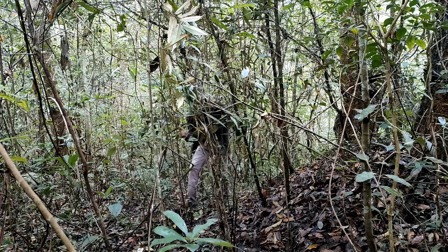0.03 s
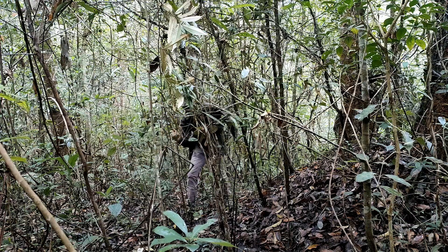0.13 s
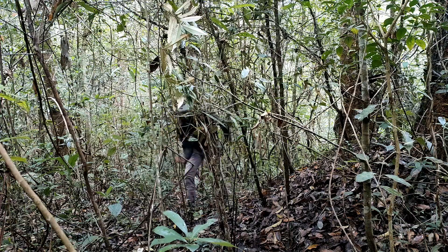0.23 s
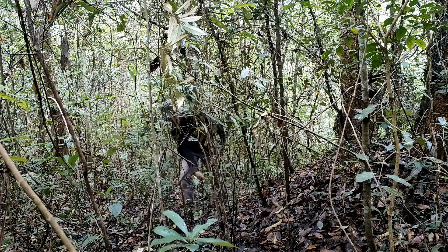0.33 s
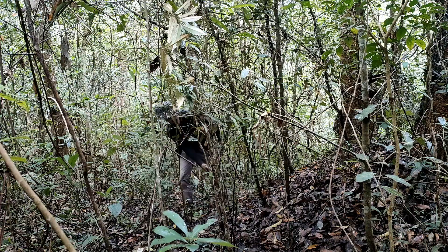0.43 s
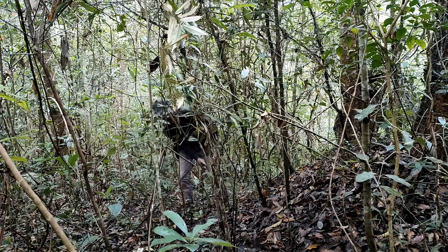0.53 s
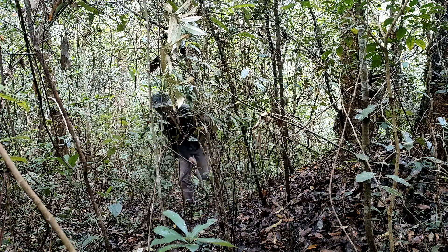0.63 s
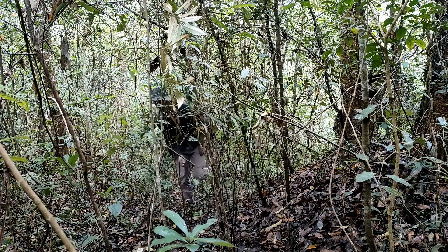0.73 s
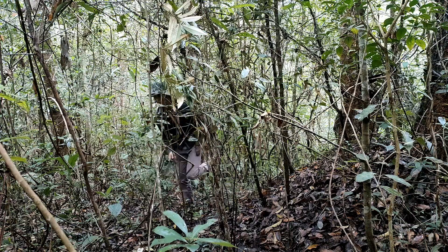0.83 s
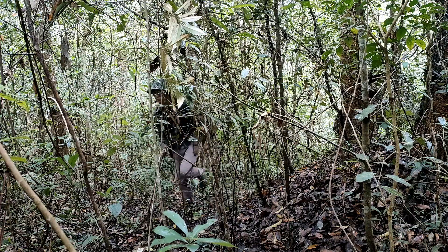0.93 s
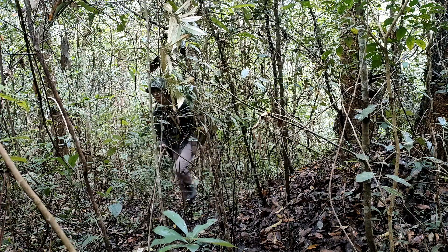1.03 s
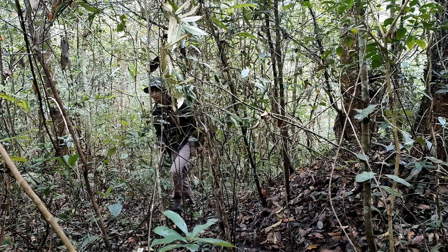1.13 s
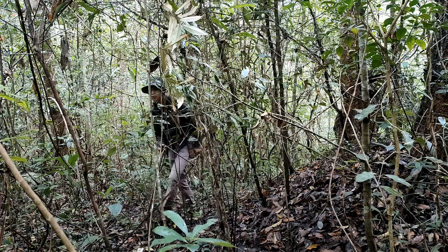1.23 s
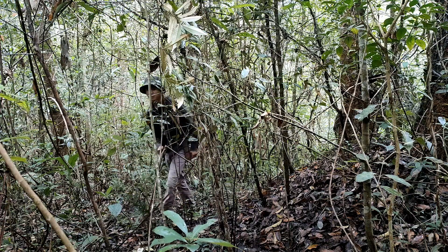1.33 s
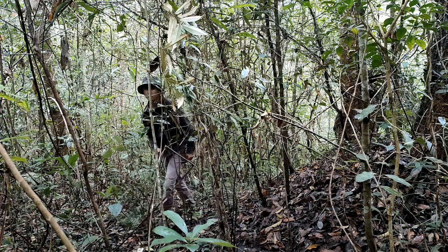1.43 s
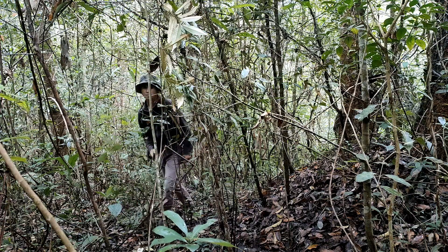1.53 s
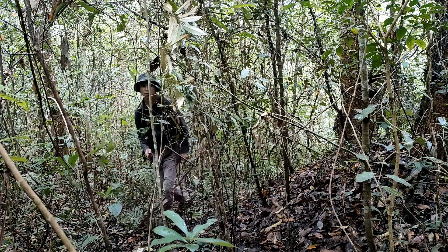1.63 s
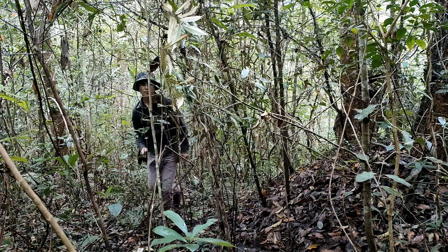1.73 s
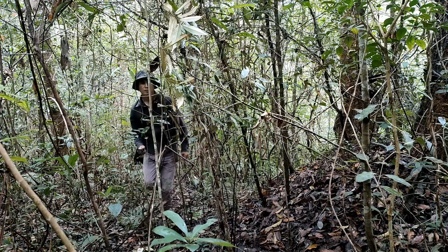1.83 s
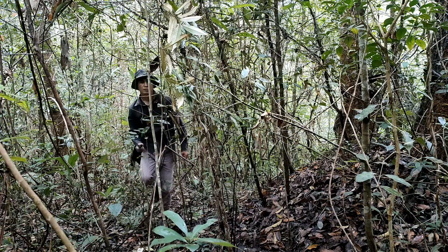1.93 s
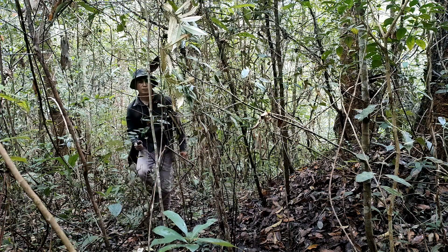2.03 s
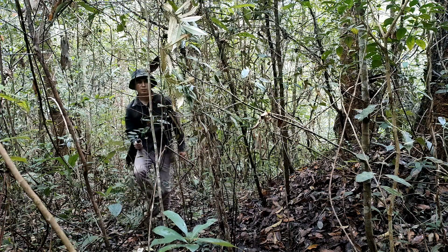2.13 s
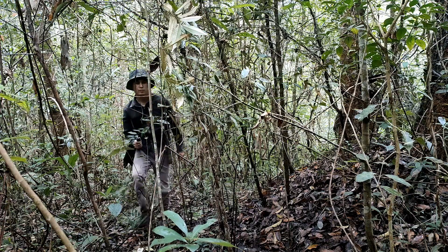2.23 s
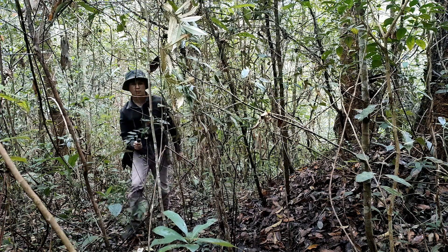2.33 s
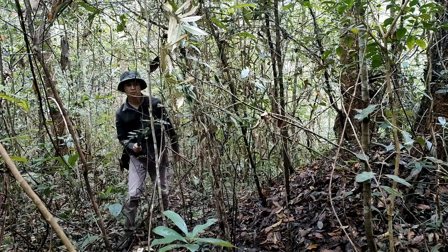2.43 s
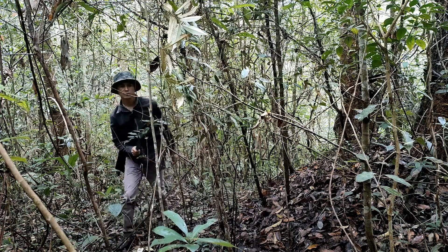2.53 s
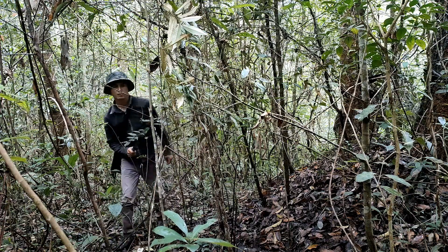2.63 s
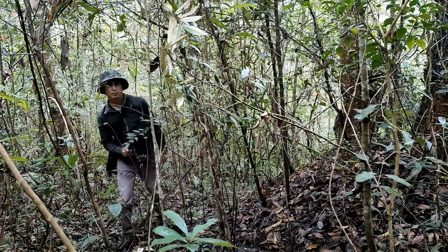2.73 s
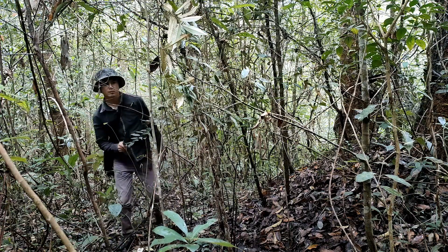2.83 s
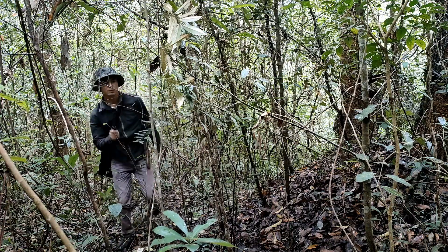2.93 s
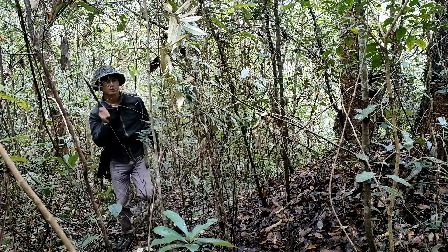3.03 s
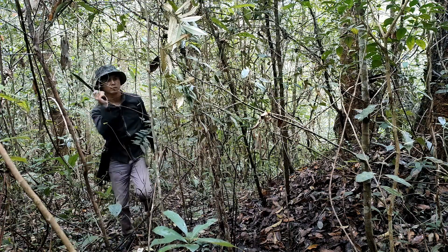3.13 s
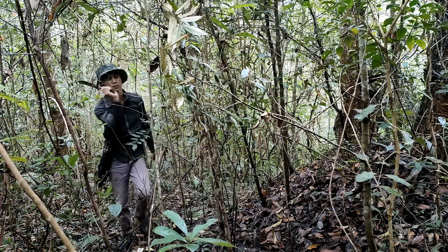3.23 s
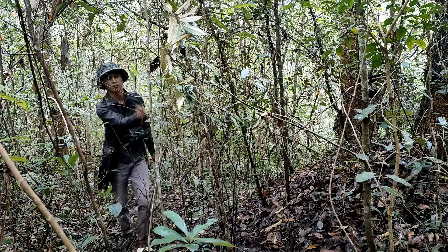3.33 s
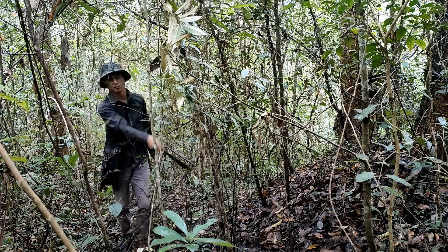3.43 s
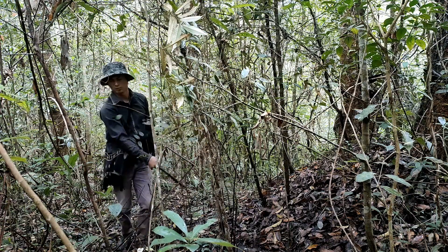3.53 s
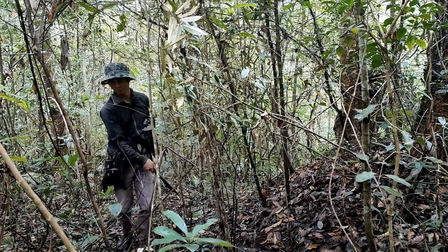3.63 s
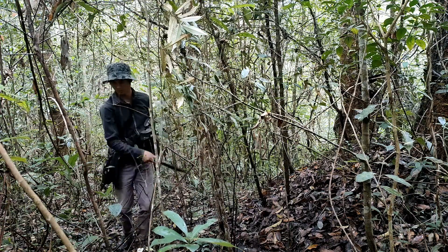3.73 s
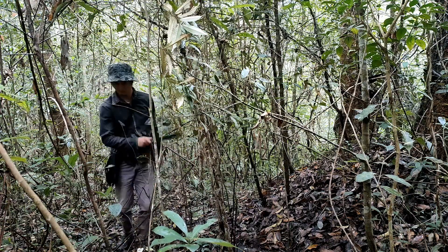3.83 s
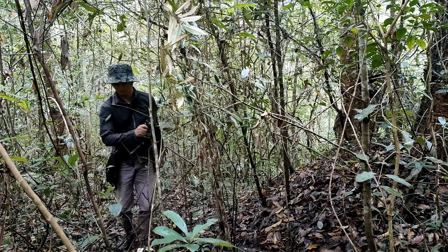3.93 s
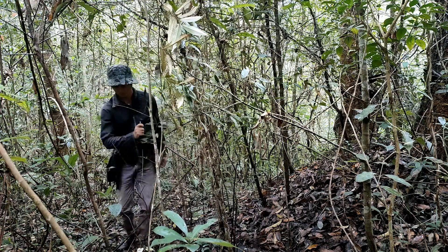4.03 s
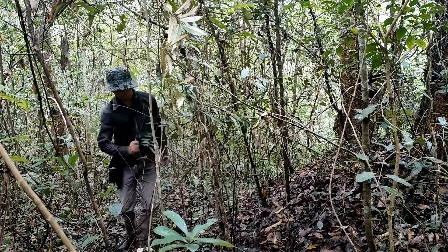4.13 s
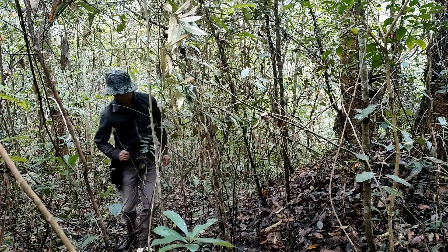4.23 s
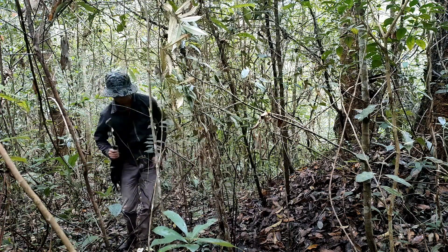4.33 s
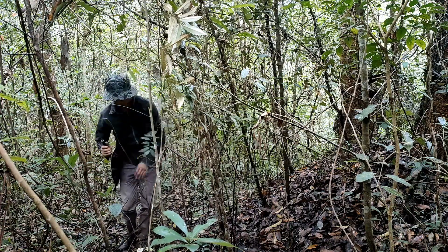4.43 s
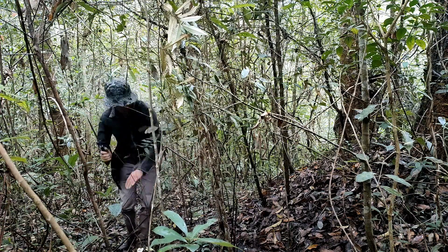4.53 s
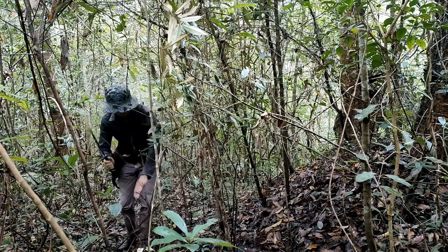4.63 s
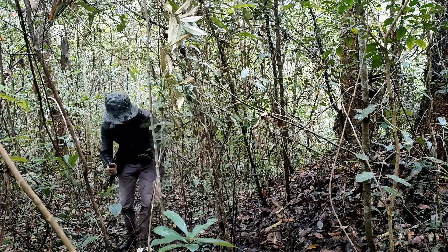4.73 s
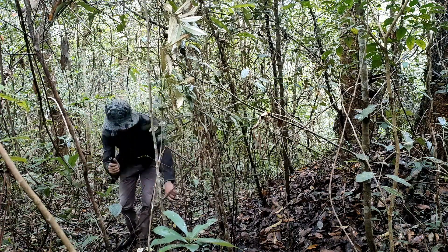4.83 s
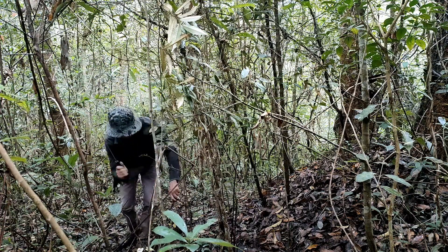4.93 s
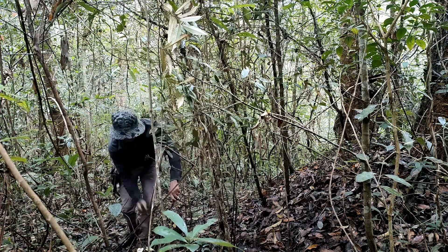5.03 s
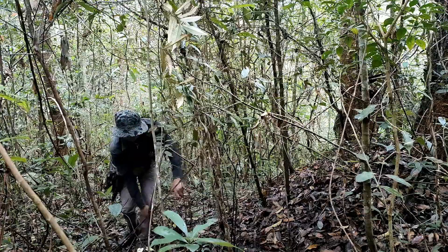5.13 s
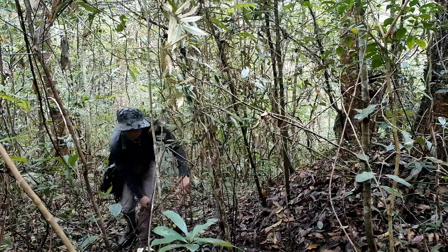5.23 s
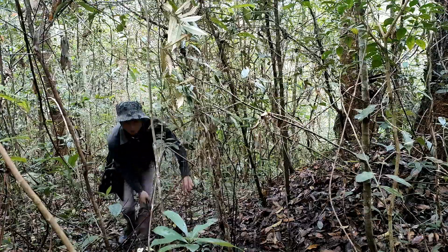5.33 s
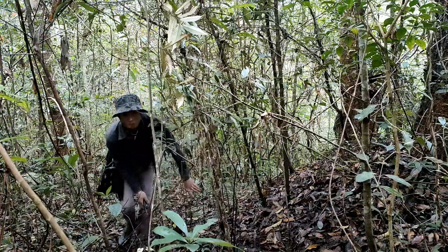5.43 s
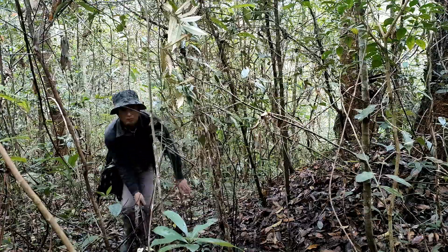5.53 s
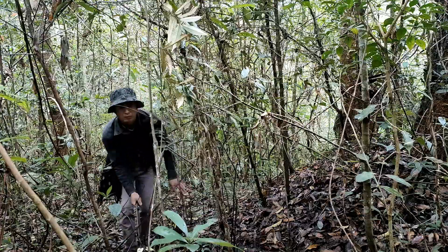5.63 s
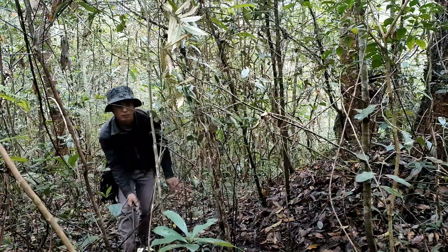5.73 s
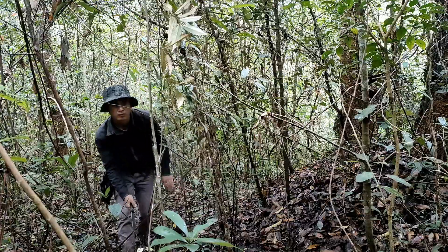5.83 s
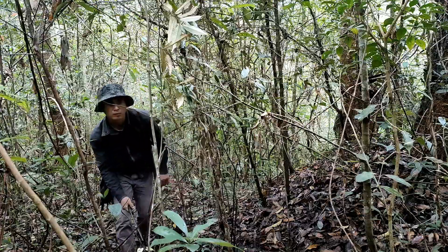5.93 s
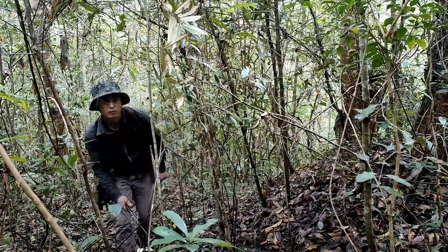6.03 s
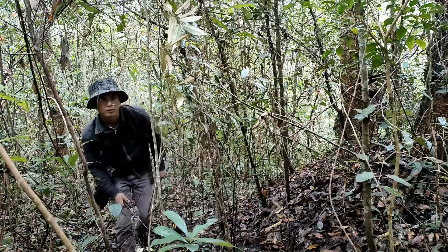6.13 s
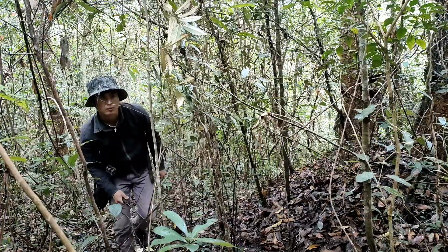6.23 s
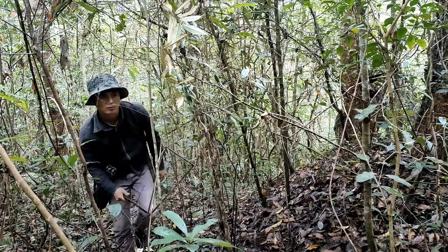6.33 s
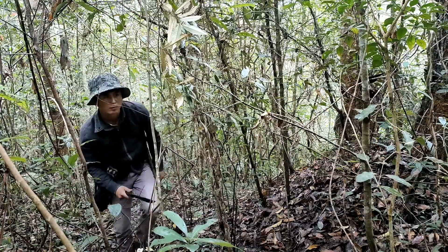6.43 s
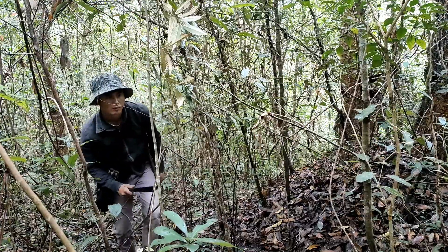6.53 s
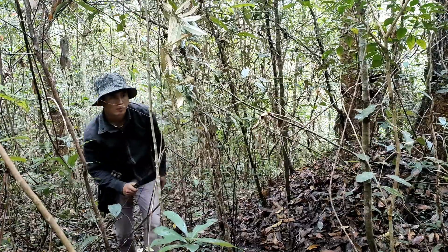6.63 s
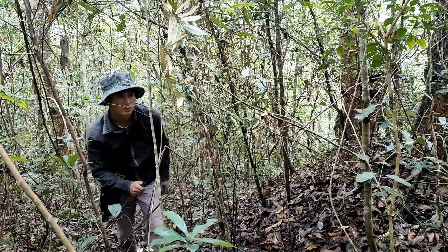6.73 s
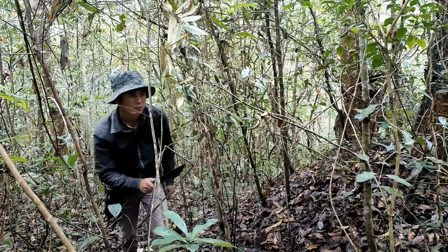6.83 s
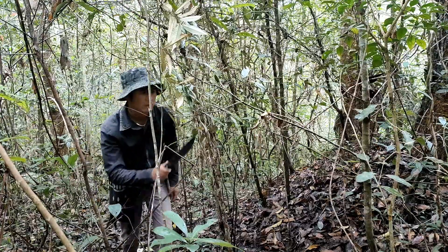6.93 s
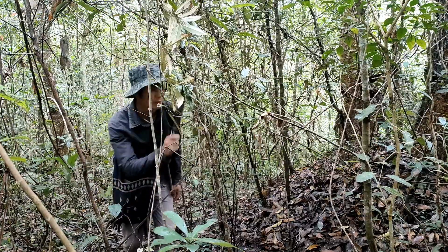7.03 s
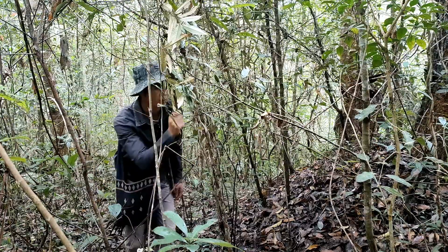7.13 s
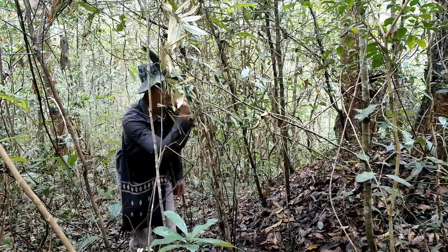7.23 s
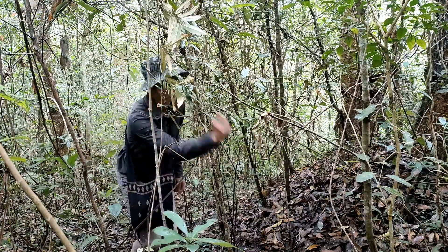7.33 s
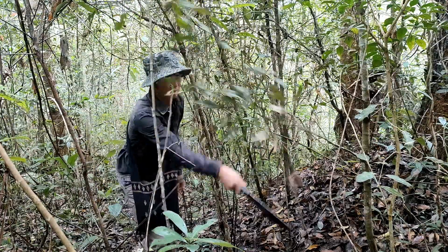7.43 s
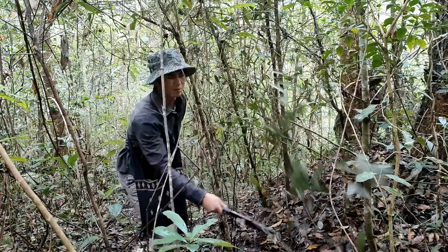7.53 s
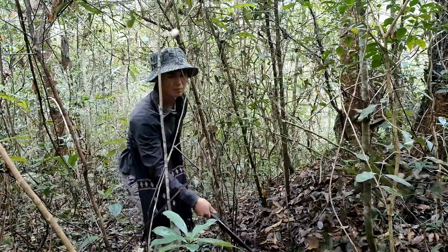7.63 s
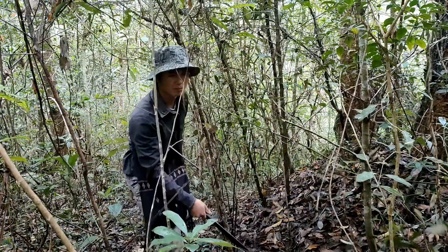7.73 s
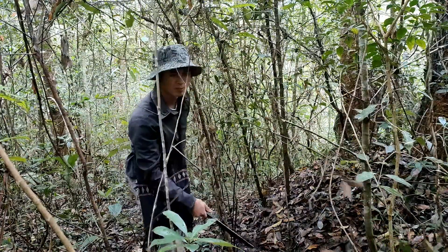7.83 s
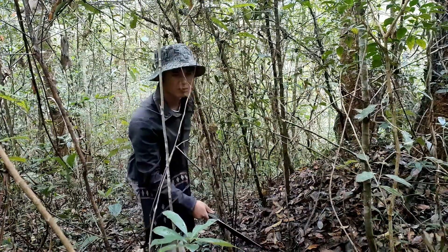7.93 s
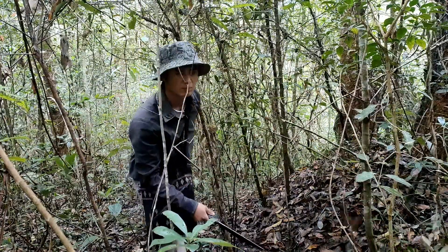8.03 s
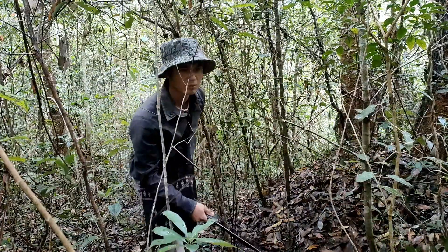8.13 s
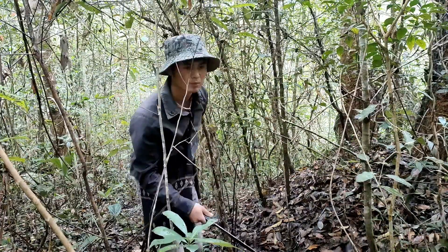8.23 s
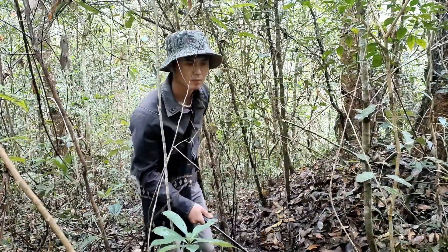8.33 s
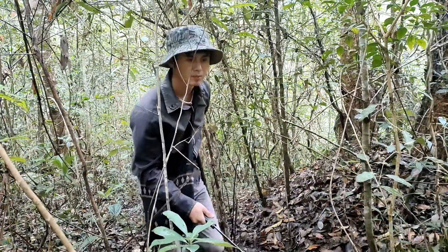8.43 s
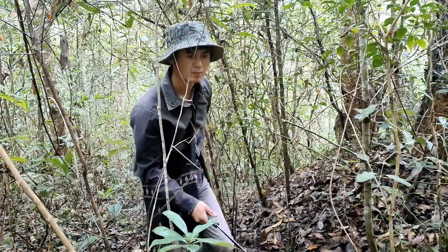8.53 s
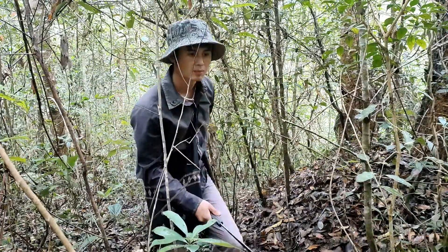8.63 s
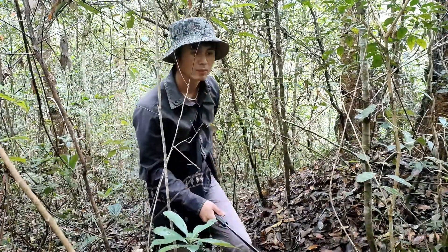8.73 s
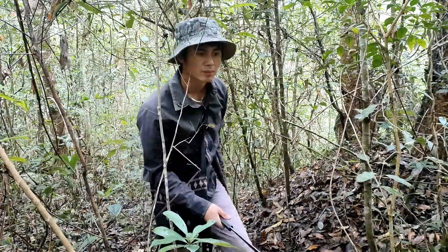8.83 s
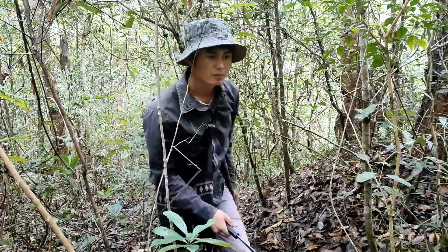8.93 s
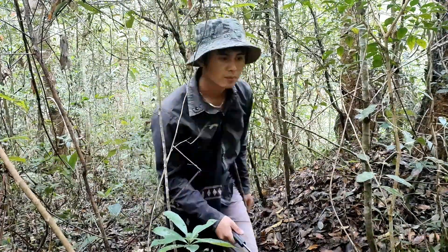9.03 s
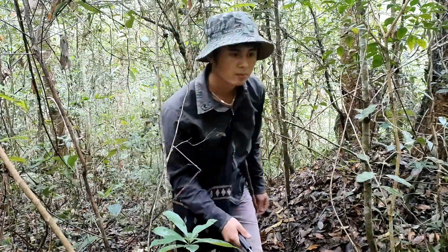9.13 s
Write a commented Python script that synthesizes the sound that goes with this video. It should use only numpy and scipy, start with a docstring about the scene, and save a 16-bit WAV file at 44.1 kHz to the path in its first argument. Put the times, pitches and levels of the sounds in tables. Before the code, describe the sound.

Outdoors among trees, faint wind rumble and soft hush surround irregular crunchy footsteps and brushing undergrowth. Crisp twig cracks and soft ground thuds punctuate quiet gaps; a far bird whistles downward three times. A sudden blade stroke near the end is by far the loudest, followed by dense cracking and rustling that fades. The stereo microphone is fixed, with light woodland echo.

```python
"""Light wind rumbles on a two-port microphone over a faint forest hush, while a walker treads dry leaf litter.
From the start the leaves crackle in dense random grains; twigs soon snap as sharp impulses with noise bursts,
and heels thud as damped sines. A far bird then whistles three times, a falling tone with an echo of trunks.
Late on, the loudest slashing brings a short blade ring and a flurry of cracks, before the litter settles."""
import sys
import numpy as np
from scipy import signal
from scipy.fft import rfft, irfft, next_fast_len
from scipy.io import wavfile
from scipy.ndimage import uniform_filter1d, map_coordinates

SR = 44100
rng = np.random.default_rng(int(sys.argv[2]) if len(sys.argv) > 2 else 0)


def unload_audio(sound):
    """Save the sound as a 16-bit wav file, at the path given as the first command line argument."""
    columns = np.transpose(np.atleast_2d(sound))
    # keep every value between -1 and 1, then stretch to whole-number steps
    steps = np.round(np.clip(columns, -1, 1) * 32767)
    wavfile.write(sys.argv[1], SR, steps.astype(np.int16))


N = 404327


def amp(db):
    """Decibel law: the amplitude ratio for a level in dB."""
    return 10 ** (np.asarray(db) / 20)


def unit(x):
    """Normalization: scale to a root-mean-square value of 1."""
    return x / np.sqrt(np.mean(x ** 2) + 1e-20)


def along(points, hz):
    """Logarithmic frequency scale: interpolate (Hz, value) points along it."""
    point_hz, value = np.transpose(points)
    return np.interp(np.log(hz + 1), np.log(point_hz + 1), value)


def curves(rows, t=np.arange(N) / SR):
    """Linear interpolation in time: one curve for each column after the time."""
    s, *columns = np.transpose(rows)
    return [np.interp(t, s, column) for column in columns]


def wobble(rate):
    """Slow random modulation: a smooth curve through random knots, rate of them a second."""
    knots = rng.standard_normal(int(N * rate / SR) + 4)
    return map_coordinates(knots, [np.arange(N) * rate / SR])


def filtered(x, response):
    """Linear filtering: multiply the spectrum by a response, a function of frequency in Hz."""
    n = x.shape[-1]
    padded = next_fast_len(n + 8192)
    return irfft(rfft(x, padded) * response(np.fft.rfftfreq(padded, 1 / SR)), padded)[..., :n]


def above(hz, edge_hz):
    """High-pass weighting: a soft step from 0 to 1, about one half at the edge."""
    return 1 / (1 + (edge_hz / (hz + 1)) ** 4)


def patchy(x, depth_db):
    """Time-frequency modulation: random gain in small and large patches, shared by both ports."""
    z = signal.stft(x, nperseg=256)[2]

    def blurred(bins, frames):
        noise = rng.standard_normal(z.shape[1:])
        return unit(uniform_filter1d(uniform_filter1d(noise, bins, 0), frames, 1))

    field = blurred(4, 8) + blurred(12, 24)
    return signal.istft(z * amp(depth_db * unit(field)), nperseg=256)[1][:, :N]


# Wind pressure spectrum: frequency_hz [Hz], relative_level_db [dB per Hz]
RUMBLE_SPECTRUM = [(8.8, -23), (15, 0.5), (37, 2), (76, -10), (172, -15), (250, -18.5), (320, -33),
                   (550, -120)]
# Wind strength, averaged over the two ports: start_s [s], level_db [dB]
WIND_LEVEL = [(0, -58), (.54, -56), (1.1, -63.5), (1.71, -57), (2.04, -63.5), (2.63, -60), (4.03, -57),
              (5.3, -59.5), (6.7, -60.5), (7.35, -66), (7.69, -52.5), (8.38, -60), (9.17, -61.5)]
# Forest background spectrum: frequency_hz [Hz], relative_level_db [dB per Hz]
HUSH_SPECTRUM = [(59, -33), (100, 0), (490, -5), (522, -4), (556, -5.5), (1330, -11), (1440, -14.5),
                 (1600, -15), (10300, -29), (15800, -61)]


def air():
    """Partial coherence: wind rumble differs from port to port, over a steady noise hush."""
    hush_db = -69
    left, right, both = rng.standard_normal((3, N))
    wind = np.array([left, right]) + 0.46 * both
    lumps = amp(2.2 * np.array([wobble(8), wobble(8)]))
    rumble = unit(lumps * filtered(wind, lambda hz: amp(along(RUMBLE_SPECTRUM, hz))))
    port_gain = amp([[.5], [-.5]])  # the left port receives 1 dB more wind
    noise = patchy(rng.standard_normal((2, N)), depth_db=0.5)
    hush = unit(filtered(noise, lambda hz: amp(along(HUSH_SPECTRUM, hz))))
    return amp(curves(WIND_LEVEL)[0]) * rumble * port_gain + amp(hush_db) * hush


# Faint stirring of undergrowth between crunches: start_s [s], crackle_level_db [dB]
STIR_LEVEL = [(0, -66), (1.1, -75.5), (1.9, -88), (2.2, -72), (2.8, -69), (3.1, -65), (3.3, -69.5),
              (4.5, -69), (4.9, -62), (5.4, -81), (6.1, -74), (6.4, -76.5), (7.0, -70), (7.25, -69.5),
              (7.3, -84), (9.17, -77)]
# Steps, brushes and slashes in leaves: peak_s [s], crackle_level_db [dB], swell_s [s to rise 20 dB],
# fade_s [s to fall 20 dB], low_crunch_db [dB re crackle], top_sheen_db [dB re crackle]
LEAF_CRUNCHES = [(0.0, -49, .01, 0.18, -11, -6), (.22, -54.5, 0.029, .1, -1, -8),
                 (0.243, -42.5, 0.017, 0.097, -10.5, -6.5), (0.461, -29, 0.0093, 0.082, -13.5, -6.5),
                 (1.33, -60.5, 0.041, 0.49, -2, -5), (1.48, -42.5, 0.13, 0.21, -16, -6),
                 (1.517, -40.5, .006, 0.069, -21, -15), (1.699, -47.5, .005, 0.056, -28, -10),
                 (1.82, -59.5, 0.13, 0.11, -9, -14), (2.6, -53, 0.28, 0.15, -4.5, -5),
                 (3.37, -56.5, 0.18, 0.11, -8, -7.5), (3.47, -44.5, 0.02, 0.26, -7.5, -11),
                 (3.51, -32, 0.0059, 0.14, -12, -4.5), (3.746, -41, 0.014, .05, -10.5, -35),
                 (3.863, -42.5, 0.067, .2, -15.5, -23), (3.986, -48.5, 0.054, 0.17, -12, -7.5),
                 (4.3, -56, 0.55, 0.17, -13, -41), (4.56, -61, .1, 0.11, -13, -6),
                 (4.71, -55.5, 0.28, .1, -12, -10), (4.774, -59, 0.023, 0.3, -17, 1),
                 (4.954, -52, 0.049, 0.28, -15, -6.5), (5.031, -45, 0.0025, 0.018, -28, -1),
                 (5.223, -35, 0.0047, 0.044, -13, -3), (5.31, -49.5, 0.049, 0.06, -15, -8.5),
                 (5.61, -61.5, 0.2, 0.33, -4.5, -28), (5.898, -52.5, 0.11, 0.11, -7.5, -2),
                 (6.07, -60, 0.16, 0.17, -12.5, -7.5), (6.224, -54, .006, 0.13, -19, -11),
                 (6.34, -62, 0.34, 0.14, -4, -9), (6.851, -53, 0.17, 0.07, -6.5, -5),
                 (7.111, -64, 0.013, 0.03, -8, -4), (7.484, -34.5, 0.0017, 0.15, -13.5, -5),
                 (7.514, -20.5, .004, 0.025, -12, -12), (7.54, -30, 0.013, 0.1, -8.5, -6.5),
                 (7.585, -34.5, 0.059, 0.044, -19, -23), (7.70, -39.5, 0.047, 0.27, -19, -5.5),
                 (7.784, -32, 0.088, 0.13, -13, -15), (7.87, -36.5, 0.11, 0.23, -11.5, -8),
                 (7.956, -35.5, 0.14, 0.2, -18, -16), (8.13, -41, 0.0087, 0.04, -8, -34),
                 (8.299, -45.5, 0.24, 0.16, -17, -14.5), (8.384, -55, 0.11, 0.054, -2, -14),
                 (8.558, -59, .05, 0.46, -8, -12), (8.889, -67.5, 0.093, .25, -4, -10.5),
                 (9.069, -55.5, 0.081, 0.073, -4.5, -6.5)]


def stirring():
    """Power addition: crunches swell exponentially, fade and settle; returns amplitudes of three bands."""
    stir_low_db, stir_top_db = -5.5, -16.5  # against the crackle
    settle_db, settle_s = -14.5, 0.28  # level under the crunch's peak, seconds to fall 20 dB
    t = np.arange(0, N + 16, 16) / SR
    power = amp(2 * (curves(STIR_LEVEL, t)[0] + np.array([[0], [stir_low_db], [stir_top_db]])))
    for s, db, swell_s, fade_s, low_db, top_db in LEAF_CRUNCHES:
        before, after = np.maximum(s - t, 0), np.maximum(t - s, 0)
        swell = amp(-40 * before / swell_s)
        fade = amp(-40 * after / fade_s)
        settling = amp(2 * settle_db - 40 * after / settle_s)
        power += swell * (fade + settling) * amp(2 * (db + np.array([[0], [low_db], [top_db]])))
    return [np.interp(np.arange(N) / SR, t, np.sqrt(p)) for p in power]


def clumps(count, spread_db, t60):
    """Clustered fracture: an envelope of random bunches, each starting at once and decaying exponentially."""
    size_db = spread_db * np.minimum(rng.exponential(size=count), 3.5)
    starts = np.bincount(rng.integers(0, N, count), amp(size_db), N)
    power_decay = amp(-120 * np.arange(SR // 10) / SR / t60)
    return np.sqrt(np.abs(signal.fftconvolve(starts ** 2, power_decay)[:N]))


# Direction of the walker as a delay between ports: start_s [s], right_port_lag_ms [ms]
WALKER_BEARING = [(0, 0.072), (2, 0.1), (5, .11), (7.3, 0.06), (7.5, -0.051), (8, -0.11), (8.7, 0.047),
                  (9.17, -0.036)]


def cracks(count, spread_db, scatter_ms):
    """Interaural-style delay: random leaf fractures reach the two ports at slightly different times."""
    when, size = rng.random(count) * N, rng.exponential(size=count)
    sign = rng.choice([-1, 1], size=count)
    lag_ms = curves(WALKER_BEARING, when / SR)[0] + scatter_ms * rng.standard_normal(count)
    lag = lag_ms * SR / 1000  # in samples
    taps, ports = np.arange(-7, 9), []
    for at in (when - lag / 2, when + lag / 2):
        cell = np.floor(at)[:, None] + taps
        offset = cell - at[:, None]
        # a windowed sinc places each impulse between samples
        pulse = np.sinc(offset) * np.cos(np.pi * offset / 18) ** 2
        pulse = pulse * (sign * amp(spread_db * size))[:, None]
        index = np.clip(cell, 0, N - 1).astype(int)
        ports.append(np.bincount(index.ravel(), pulse.ravel(), N))
    return unit(np.array(ports))


# Colour of leaves and stems: frequency_hz [Hz], relative_level_db [dB per Hz]
LEAF_SPECTRUM = [(88, -44), (150, -5), (321, -4.5), (382, -6.5), (553, -5), (833, -4.5), (1140, -2.5),
                 (2000, -6.5), (6200, -5), (7250, -7.5), (8150, -14.5), (13300, -19.5), (15800, -26.5)]


def rustle():
    """Granular noise: fracture grains on a bed of rubbing leaves, split into three bands with own envelopes."""
    crackle, crunch, sheen = stirring()
    grains = cracks(count=120000, spread_db=2, scatter_ms=.05)
    bunching = .5 + unit(clumps(count=1400, spread_db=3.5, t60=0.13))
    bunched = unit(grains * bunching)
    # the low grains run evenly; only the higher ones bunch
    grains = filtered(bunched, lambda hz: above(hz, 755)) + filtered(grains, lambda hz: 1 - above(hz, 733))
    # rubbing is independent noise at the two ports
    rubbing = filtered(rng.standard_normal((2, N)), lambda hz: 0.44 + 1.45 * above(hz, 1650))
    bed = patchy(unit(grains) + .5 * rubbing, depth_db=3.0)

    def low(hz):
        return 1 - above(hz, 2600)

    def top(hz):
        return above(hz, 9400)

    def mid(hz):
        return 1 - low(hz) - top(hz)

    def band(share):
        return unit(filtered(bed, lambda hz: amp(along(LEAF_SPECTRUM, hz)) * share(hz)))

    return crackle * band(mid) + crunch * band(low) + sheen * band(top)


# Sharp sounds: snapping twigs and slashed stems, except the row at 1.313 s, a faint part of the second
# bird call: start_s [s], burst_level_db [dB], centre_hz [Hz], low_knock_db [dB weight of the low band],
# first_crack_db [dB re burst]
SHARP_SOUNDS = [(.2109, -56, 1630, 27, 14), (0.2412, -41.5, 3660, -6, 17), (.427, -45, 5870, -3, 14),
                (0.4522, -41, 6040, 7, 3), (0.4615, -49, 6400, 2, 2), (1.037, -58.5, 3780, -3, 14),
                (1.313, -62, 5000, 21, 21), (1.42, -46, 9050, -6, 22), (1.514, -31.5, 3100, 3.5, 12),
                (1.698, -45.5, 2850, 6.5, 14), (3.463, -45, 2810, -5, 6), (3.5092, -25, 5700, -6, 10),
                (3.5293, -33, 6220, 9, 5), (3.7426, -58, 5820, 32, 18), (3.8203, -47, 2890, -4, 10),
                (3.8558, -35.5, 3570, -4, -5), (3.8703, -47, 4040, 0, 12), (3.9015, -42.5, 4960, 11, 6),
                (4.0584, -39.5, 4560, 1.5, 12), (4.121, -42.5, 3630, 1.5, 5), (4.2765, -41, 3730, 1.5, 7),
                (4.632, -50, 7700, -12, 11), (4.772, -40.5, 6060, -14, 0), (4.84, -49, 6100, -11, 14),
                (4.9517, -45, 5800, 3, 3), (5.032, -33, 5170, -22, 9), (5.222, -26.5, 5600, 3, 13),
                (5.752, -57, 5800, -1, 20), (6.2233, -45, 6820, 5.5, 16.5), (6.7076, -61, 3320, 10, 21),
                (7.1096, -60, 6170, 1, 10), (7.4829, -39, 5760, -1, 14), (7.5142, -21.5, 6060, -2.5, 13),
                (7.5778, -30, 2150, 0, 8), (7.6912, -26, 7200, -8, 13), (7.715, -27, 7440, 2.5, 9),
                (7.787, -32.5, 5110, 9, 11), (7.8476, -32, 5290, 8.5, 16), (7.9493, -52, 5090, -4, 12),
                (7.9802, -40, 4970, 8, 14), (8.1258, -36.5, 2760, 7, 11), (8.243, -45, 5260, 4, 17),
                (8.2685, -40.5, 6100, 12.5, 6), (8.29, -41, 5070, 5, -1), (8.324, -47, 5000, -8, 12),
                (8.559, -52, 3960, 11, 6), (8.717, -51.5, 5400, 14, 8), (8.8913, -57, 6040, -1, 12),
                (9.06, -45, 7060, 4, 14)]


def snaps():
    """Impulsive excitation: a sharp crack and a decaying noise burst, coloured by a peak for each event."""
    slow_t60, fast_t60 = 0.055, 0.0043  # s
    out, t = np.zeros((2, N + SR)), np.arange(SR // 4) / SR
    impulse = 1. * (np.arange(len(t)) == 24)
    rise = 1 - np.exp(-t / .0003)
    shape = rise * (amp(-60 * t / slow_t60) + amp(-60 * t / fast_t60))
    for s, db, centre_hz, knock_db, crack_db in SHARP_SOUNDS:
        lag_s = curves(WALKER_BEARING, s)[0] / 1000

        def colour(hz):
            hump = 1 + 6 / (1 + (4 * np.log((hz + 1) / centre_hz)) ** 2)
            body = above(hz, 1840) * hump + amp(knock_db) * (1 - above(hz, 1500))
            return amp(along(LEAF_SPECTRUM, hz)) * body

        def turn(hz):
            # half the lag on each port, as a phase slope
            return np.exp(1j * np.pi * hz * lag_s * np.array([[1], [-1]]))

        shared, *own = rng.standard_normal((3, len(t)))
        grainy = unit(shared * amp(2 * np.minimum(rng.exponential(size=len(t)), 4)))
        diffuse = filtered(np.array(own), lambda hz: above(hz, 1200))
        burst = unit(filtered(filtered(grainy, turn) + .5 * diffuse, colour)) * shape
        crack = filtered(impulse, lambda hz: colour(hz) * turn(hz))
        sound = burst + amp(crack_db) * crack / np.abs(crack).max()
        out[:, round(s * SR) - 12:][:, :len(t)] += amp(db) * sound
    return out[:, :N]


# Heels and falling stems on the ground: start_s [s], level_db [dB], pitch_hz [Hz], t60_s [s]
GROUND_THUDS = [(0.241, -61, 183, 0.045), (0.482, -42, 195, 0.1), (1.511, -53, 234, 0.045),
                (3.517, -42, 318, 0.089), (5.221, -49, 152, 0.14), (5.329, -25.5, 190, 0.017),
                (7.529, -33.5, 142, 0.071), (8.124, -46, 206, 0.045), (9.065, -49.5, 80.7, 0.04)]
# The blade meeting the first stem: start_s [s], pitch_hz [Hz], level_db [dB], t60_s [s]
BLADE_RING = (7.483, 11840, -45, .06)


def knocks():
    """Damped oscillation: dull pushes on soft ground with a harder knock, and the short ring of the blade."""
    out, t = np.zeros(N + SR), np.arange(SR // 4) / SR
    for s, db, pitch_hz, t60 in GROUND_THUDS:
        rise = 1 - np.exp(-t / 0.0013)
        push = -np.sin(2 * np.pi * pitch_hz * t) * amp(-60 * t / t60) * rise
        # the harder sole on top
        knock = -.45 * np.sin(2 * np.pi * 2.6 * pitch_hz * t) * amp(-60 * t / 0.0078)
        out[round(s * SR):][:len(t)] += amp(db) * (push + knock)
    s, pitch_hz, db, t60 = BLADE_RING
    ring = amp(db - 60 * t / t60) * np.sin(2 * np.pi * pitch_hz * t)
    out[round(s * SR):][:len(t)] += ring
    return out[:N]


def trunks(x, decays):
    """Diffuse reverberation: convolve with a noise tail in which each frequency decays at its own rate."""
    hz, t, z = signal.stft(rng.standard_normal((2, SR // 2)), SR, nperseg=256)
    decay = amp(-60 * t / along(decays, hz)[:, None])
    tail = signal.istft(z * decay, SR, nperseg=256)[1]
    return signal.fftconvolve(np.atleast_2d(x), tail / np.linalg.norm(tail[0]), axes=1)[:, :N]


# The falling whistle before stretching: start_s [s from call], pitch_hz [Hz], relative_level_db [dB]
WHISTLE_GLIDE = [(0, 4680, -9), (.03, 4450, -4), (.09, 4200, -1), (.125, 3920, 1.5), (.15, 3520, 2.5),
                 (.2, 3120, -1), (.3, 3020, -13)]
# Bird calls, before the direct and echo paths: start_s [s], level_db [dB], time_stretch [ratio]
BIRD_CALLS = [(.41, -44.5, 0.92), (1.243, -47, 1.06), (4.153, -49.5, .96)]
# Echo around the distant bird: frequency_hz [Hz], t60_s [s]
FAR_TRUNK_DECAY = [(2800, .4), (3600, .75)]


def bird():
    """Frequency modulation: a falling sine, a little faster or slower each call, heard direct and reverberant."""
    out = np.zeros((2, N))
    for s, db, stretch in BIRD_CALLS:
        t = (np.arange(N) / SR - s) / stretch
        pitch_hz, shape_db = curves(WHISTLE_GLIDE, t)
        gate = np.clip(np.minimum(t, WHISTLE_GLIDE[-1][0] - t) / .01, 0, 1)
        level = gate * amp(db + shape_db + 1.5 * wobble(60))
        phase = 2 * np.pi * np.cumsum(pitch_hz + 30 * wobble(150)) / SR
        note = level * np.sin(phase)
        direct = .45 * note * [[1], [.15]]  # mostly in the left port
        out += direct + trunks(note, FAR_TRUNK_DECAY)
    return out


# Echoes of sharp sounds and thuds among the trees: frequency_hz [Hz], t60_s [s]
TRUNK_DECAY = [(300, 0.35), (3000, 0.65), (12000, 0.14)]
# Port sensitivity: frequency_hz [Hz], left_over_right_db [dB]
PORT_BALANCE = [(500, -0.1), (4000, 0), (12000, -0.7)]


def scene():
    """Superposition: the sources add, pass the port balance, and join the wind and hush."""
    leaves = rustle()
    impacts = snaps() + knocks()
    echoes = amp(-11.5) * trunks(impacts, TRUNK_DECAY)
    heard = leaves + impacts + echoes + bird()

    def balance(hz):
        return amp(along(PORT_BALANCE, hz) / 2 * np.array([[1], [-1]]))

    return air() + filtered(heard, balance)


def record(dry):
    """Band limitation: the sound holds nothing above about 15.85 kHz, after a sharp cut-off."""
    top_hz = 15850
    return filtered(dry, lambda hz: hz < top_hz)


dry = scene()
out = record(dry)
unload_audio(out)
```